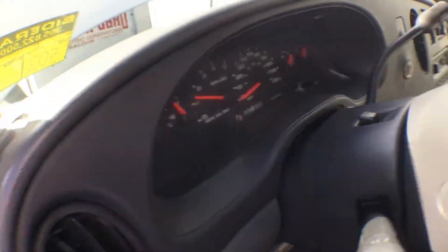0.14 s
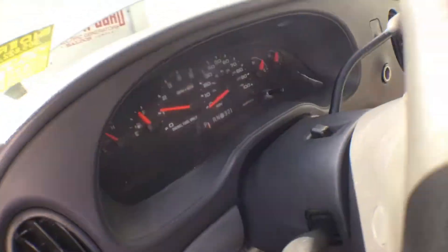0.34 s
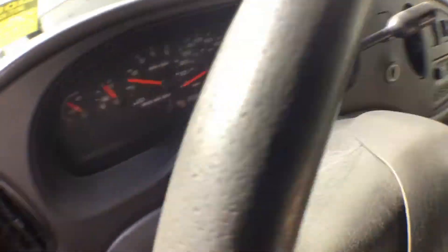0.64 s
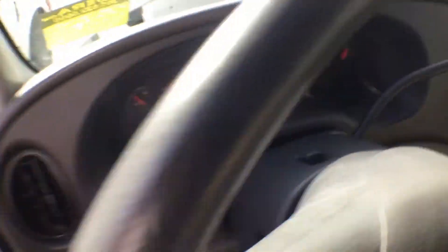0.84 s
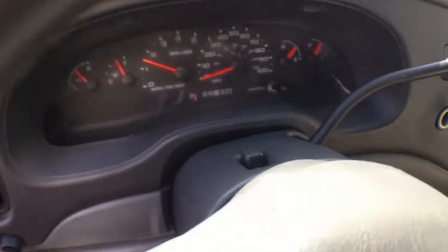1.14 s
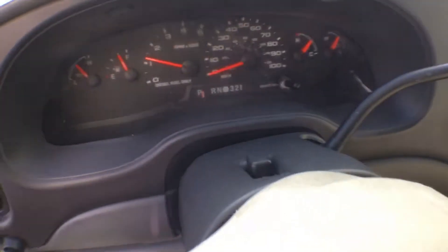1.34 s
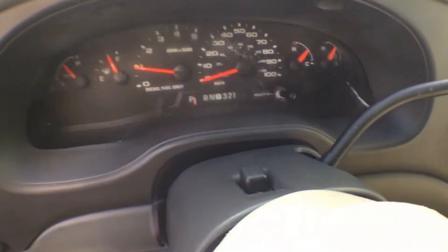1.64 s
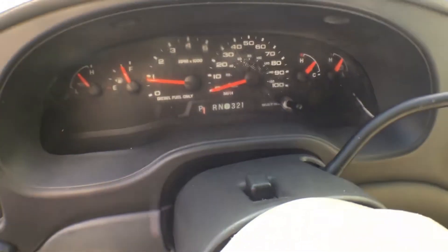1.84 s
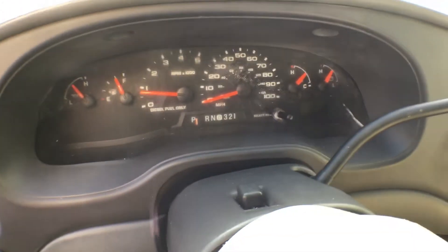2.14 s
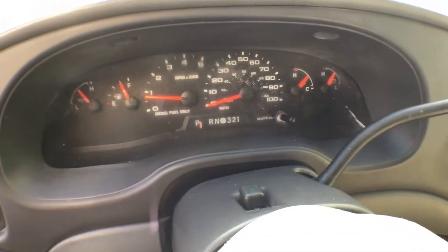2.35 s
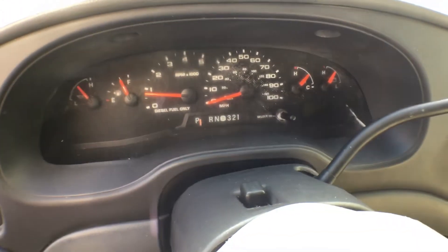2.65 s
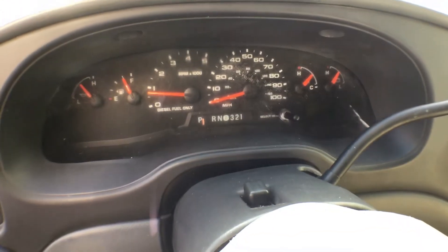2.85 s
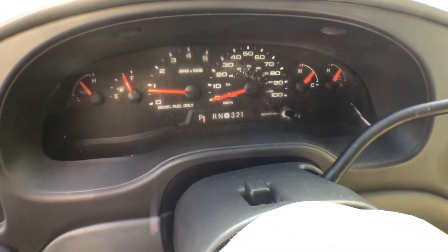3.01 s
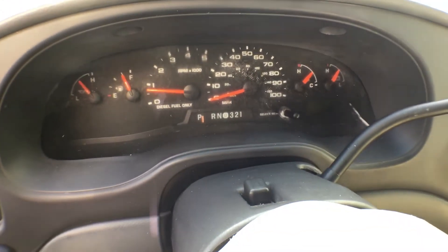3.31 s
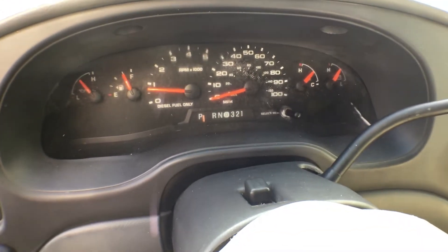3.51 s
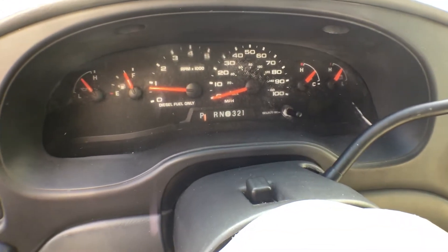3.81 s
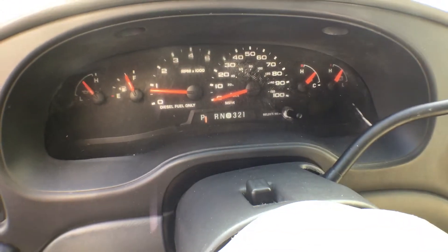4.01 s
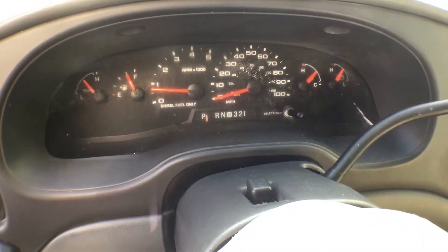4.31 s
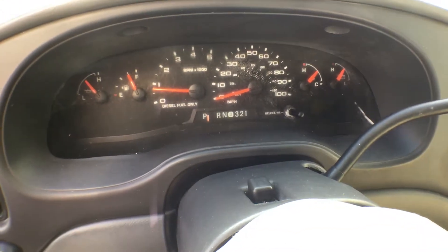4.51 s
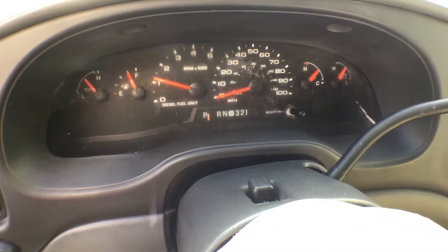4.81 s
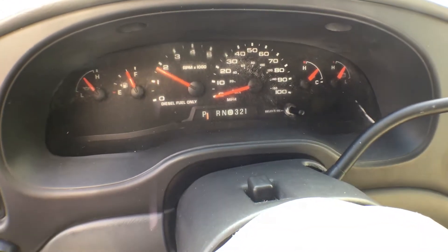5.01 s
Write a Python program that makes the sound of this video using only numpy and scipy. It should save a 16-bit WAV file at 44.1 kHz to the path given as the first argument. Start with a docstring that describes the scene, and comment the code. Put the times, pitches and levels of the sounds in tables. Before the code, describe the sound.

A large diesel heard from the driver's seat: throttle blip, hard trim knocks, steady knocking idle, and a final fast rev.

```python
"""In the cab of a V8 diesel van, at the driver's seat: a blip of throttle, a fall back to idle, another rev.
Firings boom through cab resonances as multiples of the cycle rate; a rough tone whines as the injection pump.
Loosely repeated contacts ring the block as knock and clatter and tick in the injectors, with a fine hiss.
Close to the microphone, decaying thumps and noise bursts knock on the steering column trim, once hard
enough to overload the input, and a loose panel rattles softly."""
import sys
import numpy as np
from scipy import signal
from scipy.fft import rfft, irfft, next_fast_len
from scipy.io import wavfile
from scipy.ndimage import uniform_filter1d

SR = 44100
rng = np.random.default_rng(int(sys.argv[2]) if len(sys.argv) > 2 else 0)


def unload_wav(signal):
    """Save mono or channel-first audio to the path in sys.argv[1] as 16-bit WAV at rate SR, clipped to [-1, 1]."""
    wavfile.write(
        sys.argv[1],
        SR,
        np.round(np.clip(np.atleast_2d(signal).T, -1, 1) * 32767).astype(np.int16),
    )


N = 227688
TIME = np.arange(N) / SR
CYLINDERS = 8
IDLE_HZ = 45.3  # reference idle speed, in firings per second


def from_db(db):
    """Decibels to gain."""
    return 10 ** (np.asarray(db) / 20)


def rms_one(x):
    """Scale to unit power."""
    return x / np.sqrt(np.mean(x ** 2) + 1e-20)


def evened(x):
    """Unit power over any fifth of a second; the faster throb stays."""
    return x / np.sqrt(uniform_filter1d(x ** 2, size=SR // 5) + 1e-12)


def drift(rate):
    """Slow chance with spread 1, changing about rate times a second."""
    steps = rng.standard_normal(int(rate * N / SR) + 2)
    return rms_one(np.interp(TIME * rate, np.arange(len(steps)), steps))


def colour(x, points):
    """Causal (minimum-phase) filter with the given spectrum and unit power gain."""
    size = next_fast_len(N + SR // 4, True) // 2 * 2
    hz, db = np.transpose(points)
    octave = np.log2(np.maximum(np.fft.rfftfreq(size, 1 / SR), 1))
    # beyond the end points the spectrum falls 20 dB per octave
    outside = np.abs(octave - np.clip(octave, np.log2(hz[0]), np.log2(hz[-1])))
    gain = rms_one(from_db(np.interp(octave, np.log2(hz), db) - 20 * outside))
    # folding the cepstrum forward in time gives minimum phase
    cepstrum = irfft(np.log(gain))
    cepstrum[1:size // 2] *= 2
    cepstrum[size // 2 + 1:] = 0
    return irfft(rfft(x, size) * np.exp(rfft(cepstrum)))[:N]


def add(track, s, sound):
    """Lay a sound on the track from time s."""
    start = max(int(s * SR), 0)
    track[start:start + len(sound)] += sound[:max(N - start, 0)]


# engine speed: time_s, firing_rate_hz
ENGINE_SPEED = [(0, 68), (.24, 59), (.5, 124), (.6, 135), (.76, 122), (1.1, 74), (1.45, 44.9), (2.2, 45.5),
                (2.55, 43.54), (4.35, 43.6), (4.65, 98), (4.75, 129), (4.99, 181), (5.16, 162)]
CYCLE_START_S = 3.284  # an engine cycle is counted from here


def crankshaft():
    """Firing rate, and its running sum: the crank angle counted in firings, eight to a cycle."""
    time_s, firing_rate_hz = np.transpose(ENGINE_SPEED)
    speed = np.interp(TIME, time_s, firing_rate_hz)
    crank = np.cumsum(speed) / SR
    return speed, crank - np.interp(CYCLE_START_S, TIME, crank)


def each_turn(crank):
    """A swing from 1 to -1 and back in every turn of the crankshaft, twice a cycle."""
    return np.cos(2 * np.pi * crank / (CYLINDERS / 2))


# presses of the pedal: start_s, held_until_s, released_s, depth (0-1)
PEDAL_PRESSES = [(.15, .55, .83, .91), (4.315, 4.94, 5.0, 1)]
PRESS_ATTACK_S = .085


def pedal(lag_s=0):
    """How far the pedal is down, 0-1: a quick press, a hold, a release."""
    travel = np.zeros(N)
    for down, held, up, depth in PEDAL_PRESSES:
        travel += depth * np.interp(TIME - lag_s, [down, down + PRESS_ATTACK_S, held, up], [0, 1, 1, 0])
    return travel


# the governor shuts off the fuel, then catches the falling engine
FUEL_CUT_S, FUEL_FADE_S, CATCH_S = .97, 0.11, 1.298
# and lets go again over this range of firings per second
GOVERNOR_FULL_HZ, GOVERNOR_OFF_HZ = 60, 80


def settled(settle_s):
    """Approach from 0 to 1 once the governor has caught the engine."""
    return 1 - np.exp(-np.maximum(TIME - CATCH_S, 0) / settle_s)


# layer loudness: idle_db, pull_db (at idle speed), pull_rise_db_per_hz (of firing rate),
# coast_db (at idle speed), fuel_cut_drop_db (negative rises), settle_s (into idle), pedal_lag_s
LAYER_LEVELS = {"boom": (-25.1, -16, .03, -21.4, -.8, .7, .07),
                "knock": (-32.7, -28, .03, -38.3, 4.2, .13, .04),
                "clatter": (-30.6, -32.8, .076, -38.4, 5, .1, .01),
                "injectors": (-45.5, -46.9, .076, -52.7, 5.5, 0.1, .025),
                "hiss": (-58.4, -52.4, 0.0667, -60, 5.5, .045, .03),
                "pump": (-49.2, -45.6, .016, -58.5, 5, 0.2, 0)}
COAST_DB_PER_DOUBLING = 4.5


def loudness(layer, speed):
    """Gain of a layer as the engine passes between coasting, idling and pulling."""
    idle_db, pull_db, pull_rev_db, coast_db, cut_db, settle_s, lag_s = LAYER_LEVELS[layer]
    caught = settled(settle_s)
    shut_off = np.clip((TIME - FUEL_CUT_S) / FUEL_FADE_S, 0, 1) * (1 - caught)
    idling = caught * np.interp(speed, [GOVERNOR_FULL_HZ, GOVERNOR_OFF_HZ], [1, 0])
    db = coast_db + COAST_DB_PER_DOUBLING * np.log2(speed / IDLE_HZ)
    db = db + idling * (idle_db - db) - shut_off * cut_db
    pulling_db = pull_db + pull_rev_db * (speed - IDLE_HZ)
    return from_db(db + pedal(lag_s) * (pulling_db - db))


# the cab's answer to the firings: pitch_hz, level_db (relative)
CAB_RESPONSE = [(24, -46), (34, -33), (43, -4.5), (60, 0), (88, 1), (105, 5.5), (128, 2), (160, 0.5),
                (190, -4), (236, -0.5), (280, -18), (345, -11), (430, -24), (600, -31.5)]
# beats per engine cycle strengthened or weakened by the drivetrain; order 8 is the firing rate:
# order, boost_db (negative weakens), strongest_effect_firing_rate_hz, width_octaves
DRIVETRAIN_ORDERS = [(5, 13, 180, .4), (6, 8, 132, .3), (8, 20, 70, .8), (10, 7, 175, .4), (11, 7, 44, .3),
                     (12, 5, 150, .4), (13, 4, 44, .3), (14, 3, 44, .3), (15, 3, 125, .3),
                     (16, 13, 50, .75), (20, -7, 44, .3), (24, 3, 44, .5), (32, 6, 44, .5)]


def boom(crank, speed, churn=0.29, churn_db=3.0, fade_db_per_order=.07, count=52):
    """Unequal cylinders sound every multiple of the cycle rate; each glides through the cab resonances."""
    hz, db = np.transpose(CAB_RESPONSE)
    boost_db = {}
    for order, peak_db, centre_hz, width in DRIVETRAIN_ORDERS:
        boost_db[order] = peak_db * np.exp(-(np.log2(speed / centre_hz) / width) ** 2)
    tones = np.zeros(N)
    for order in range(2, count):
        cab_db = np.interp(order * speed / CYLINDERS, hz, db)
        gain = from_db(cab_db + boost_db.get(order, 0) - fade_db_per_order * order)
        # no two cycles are quite alike, which blurs the high orders most
        waver = .012 * order * drift(14)
        tones += gain * np.sin(2 * np.pi * (order * crank / CYLINDERS + rng.random()) + waver)
    # gas flow grows rougher with speed and surges at every firing
    surge = np.sqrt(speed / IDLE_HZ) * from_db(churn_db * np.cos(2 * np.pi * crank))
    turbulence = churn * surge * colour(rng.standard_normal(N), CAB_RESPONSE)
    return evened(evened(tones) + turbulence)


# whine at idle, rise with the pedal down, overshoot at the catch and its settling time
PUMP_HZ, PUMP_RISE_HZ, PUMP_OVERSHOOT_HZ, PUMP_SETTLE_S = 5185, 270, 652, .13


def pump(crank, speed, sway_hz=200, width_hz=330, throb_db=2.0, chirp_db=6.0, uneven=.4):
    """A rough whine pulses at each firing and rises with the pedal; at idle it dips and chirps each turn."""
    overshoot = (TIME > CATCH_S) * (1 - settled(PUMP_SETTLE_S))
    hz = PUMP_HZ + PUMP_RISE_HZ * pedal() + PUMP_OVERSHOOT_HZ * overshoot
    # the dip fades quickly as the revs climb
    dip = np.maximum(each_turn(crank - 1.1), 0) * (1 + uneven * drift(11)) * (IDLE_HZ / speed) ** 3
    phase = 2 * np.pi * np.cumsum(hz - sway_hz * dip) / SR
    whine = drift(width_hz) * np.cos(phase) + drift(width_hz) * np.sin(phase)
    return evened(whine * from_db(chirp_db * dip + throb_db * np.cos(2 * np.pi * (crank - .62))))


def rattle(crank, throb_db, slop_s, bed, uneven_db, lope_db, lope_firing, count=360):
    """Parts touch loosely at the same crank angles every cycle, hardest after a firing and once a turn."""
    angles, sizes = rng.uniform(0, CYLINDERS, count), rng.standard_normal(count)
    starts = CYLINDERS * np.arange(crank[0] // CYLINDERS, crank[-1] / CYLINDERS)
    times = np.interp(starts[:, None] + angles, crank, TIME, left=-1, right=-1)
    at = np.round((times + slop_s * rng.standard_normal(times.shape)) * SR).astype(int)
    sizes = sizes * from_db(uneven_db * rng.standard_normal(times.shape))
    heard = (at >= 0) & (at < N)
    contacts = evened(np.bincount(at[heard], sizes[heard], N))
    # crank % 1 counts from one firing to the next
    strength_db = lope_db * each_turn(crank - lope_firing) - throb_db * (crank % 1)
    return (contacts + bed * rng.standard_normal(N)) * from_db(strength_db)


def block(modes, crank, speed, shakes):
    """Contacts ring engine resonances that swell or dip by the nearest cylinder, less so as revs rise."""
    out = np.zeros(N)
    for k, (hz, width_hz, db, swell_db, nearest, rev_db) in enumerate(modes):
        band = signal.butter(2, [hz - width_hz / 2, hz + width_hz / 2], "band", fs=SR, output="sos")
        ringing = evened(signal.sosfilt(band, shakes[k % 2]))
        swell = swell_db * np.cos(2 * np.pi * (crank - nearest) / CYLINDERS) * IDLE_HZ / speed
        out += ringing * from_db(db + swell + rev_db * np.log2(speed / IDLE_HZ))
    return evened(out)


# low block resonances: pitch_hz, width_hz, level_db (relative, at idle speed), swell_db (over a cycle
# at idle speed), nearest_cylinder (in firings, wraps round after 8), rise_db_per_doubling (of speed)
KNOCK_MODES = [(346, 130, -10.5, 2, 3.8, -1), (580, 238, -4.5, -2.5, 1.1, 2), (723, 97, -7.5, 0, 5.1, 4.5),
               (835, 77, -4.5, 4, 3.15, 3), (985, 196, -4, 4.5, 5.35, 3.5), (1163, 56, 0, 2.5, 1.4, 2),
               (1343, 164, -3.5, 1.5, 0.42, 3), (1446, 183, -0.5, 2.5, 0.18, 3.5)]


def knock(crank, speed):
    """Combustion shakes the low resonances of the block."""
    combustion = [rattle(crank - .5, throb_db=2.0, slop_s=.00007, bed=0.44, uneven_db=0.5,
                         lope_db=0.6, lope_firing=1.7) for _ in range(2)]
    return block(KNOCK_MODES, crank, speed, combustion)


# valve gear resonances: pitch_hz, width_hz, level_db (relative, at idle speed), swell_db (over a cycle
# at idle speed), nearest_cylinder (in firings, wraps round after 8), rise_db_per_doubling (of speed)
CLATTER_MODES = [(1946, 356, -8, 0.36, 1.7, 1), (2134, 94, -9.5, 0.64, 1.4, 0.3),
                 (2234, 36, -6, 3.5, 1.4, -2), (2465, 410, -2.5, 0.94, 1.1, 0.1),
                 (2731, 126, -5, 0.33, 4.5, -1.1), (2960, 195, -3.5, 2.7, 2.2, -1),
                 (3140, 265, -8, 1.1, 1.1, -0.7)]


def clatter(crank, speed):
    """Valve contacts ring the middle resonances of the engine."""
    valves = [rattle(crank - .55, throb_db=3.0, slop_s=.00007, bed=0.63, uneven_db=0.5,
                     lope_db=1.0, lope_firing=.7) for _ in range(2)]
    return block(CLATTER_MODES, crank, speed, valves)


def injector_ticks(crank):
    """Sharp, noisy contacts fall away strongly after each firing."""
    return rattle(crank - .38, throb_db=5.3, slop_s=.0001, bed=1.5, uneven_db=1.5,
                  lope_db=0.9, lope_firing=1.8)


# injector resonances: pitch_hz, width_hz, level_db (relative, at idle speed), swell_db (over a cycle
# at idle speed), nearest_cylinder (in firings, wraps round after 8), rise_db_per_doubling (of speed)
INJECTOR_MODES = [(4247, 44, -9, 2.4, 2.6, -0.83), (4200, 1200, -7.5, 1, 2.2, 2.2),
                  (5060, 850, 0, 0.92, 0.72, 1), (5480, 1340, -1, 0.92, 2.6, 1),
                  (7780, 810, -10, 1.6, 8.8, 1)]


def injectors(crank, speed):
    """Two tracks of ticks ring the high, mostly broad resonances of the injectors."""
    return block(INJECTOR_MODES, crank, speed, [injector_ticks(crank) for _ in range(2)])


# fine hiss of fuel and air: pitch_hz, level_db (relative)
HISS_SPECTRUM = [(500, -4), (3000, 14), (4000, 16), (5600, -17), (6900, 3), (8200, 14), (9000, 8.5),
                 (10000, 4.5), (11500, 11), (12400, 3), (13100, 5), (14500, 0), (15800, -5)]


def hiss(crank):
    """Fuel and air hiss in time with the injectors: a separate track of ticks, coloured."""
    return evened(colour(injector_ticks(crank), HISS_SPECTRUM))


# knocks on the trim, close by: start_s, thump_hz, thump_db, clack_db, snap_db
TRIM_KNOCKS = [(.176, 282, -5, -13, -31), (.183, 213, -2, -16, -19.5), (.973, 190, 2.5, -12, -13),
               (.984, 330, -3.5, -10, -23), (.991, 198, -2, -13, -10), (0.9991, 400, -5, -2, -2),
               (1.004, 510, -6, -13, -2.5), (1.29, 239, -17, -33, -58), (1.357, 327, -11.5, -15, -18),
               (1.366, 217, -5.5, -42, -55), (1.507, 226, -6, -24.5, -38), (1.646, 333, -6.5, -19, -50),
               (1.787, 305, -11.5, -37, -58)]
# dull contact of plastic trim: pitch_hz, level_db (relative)
CLACK_SPECTRUM = [(200, -3.5), (420, -0.5), (600, 0), (800, -2.5), (1000, -8), (1300, -3), (1800, -11.5),
                  (3000, -23)]
# sharp contact of plastic trim: pitch_hz, level_db (relative)
SNAP_SPECTRUM = [(600, -3.5), (1400, -41), (2150, 1.5), (2400, -1.5), (2720, 7.5), (3200, -6.5),
                 (4500, -13.5), (5400, -3), (6500, -20.5), (8000, -18.5), (10500, -25), (12000, -22),
                 (16000, -23)]


def bumps(thump_t60=0.051, clack_t60=0.044, snap_t60=0.023, tail_db=-35, cab_t60=0.24):
    """Each knock is a hollow thump, a clack and a sharp snap; clack and snap leave a short tail in the cab."""
    t = np.arange(SR // 5) / SR
    thumps, clacks, snaps = np.zeros((3, N))
    tail = from_db(tail_db - 60 * t / cab_t60)
    for s, hz, thump_db, clack_db, snap_db in list(TRIM_KNOCKS) + loose_panel():
        grit = rng.standard_normal((2, len(t)))
        onset = 1 - np.exp(-t / 0.0018)
        add(thumps, s, np.sin(2 * np.pi * hz * t) * onset * from_db(thump_db - 60 * t / thump_t60))
        add(clacks, s, grit[0] * from_db(clack_db) * (from_db(-60 * t / clack_t60) + tail))
        add(snaps, s, grit[1] * from_db(snap_db) * (from_db(-60 * t / snap_t60) + tail))
    return thumps + colour(clacks, CLACK_SPECTRUM) + colour(snaps, SNAP_SPECTRUM)


# the panel's first touch, base gap, middle pitch, first thump level and fade
LOOSE_START_S, LOOSE_GAP_S, LOOSE_HZ, LOOSE_DB, LOOSE_FADE_DB_PER_S = 1.38, .027, 330, -15.5, 22


def loose_panel(spread=.1, uneven_db=2.0, clack_db=-17, snap_db=-36, count=16):
    """A loose panel rattles in soft, uneven touches that die away, given as further rows of knocks."""
    late, pitch, strength = rng.standard_normal((count, 3)).T
    since = LOOSE_GAP_S * (np.arange(count) + late / 4)
    db = LOOSE_DB - LOOSE_FADE_DB_PER_S * since + uneven_db * strength
    hz = LOOSE_HZ * np.exp(spread * pitch)
    return list(zip(LOOSE_START_S + since, hz, db, db + clack_db, db + snap_db))


def scene():
    """The crankshaft times every layer of the engine; the knocks on the trim lie on top."""
    speed, crank = crankshaft()
    sounds = {"boom": boom(crank, speed),
              "pump": pump(crank, speed),
              "knock": knock(crank, speed),
              "clatter": clatter(crank, speed),
              "injectors": injectors(crank, speed),
              "hiss": hiss(crank)}
    engine = sum(loudness(layer, speed) * sound for layer, sound in sounds.items())
    return (engine + bumps())[None]


CUTOFF_HZ = 15900


def record(dry):
    """The microphone input rounds off peaks near full scale; a steep low-pass cuts the top."""
    clipped = dry / (1 + dry ** 8) ** (1 / 8)
    low_pass = signal.ellip(10, .1, 70, CUTOFF_HZ, fs=SR, output="sos")
    return signal.sosfilt(low_pass, clipped)


dry = scene()
out = record(dry)
unload_wav(out)
```